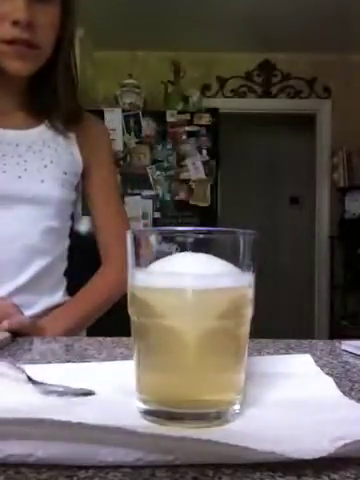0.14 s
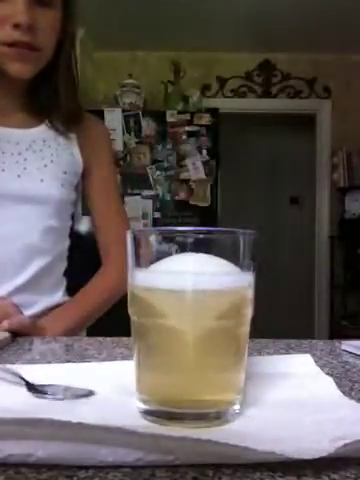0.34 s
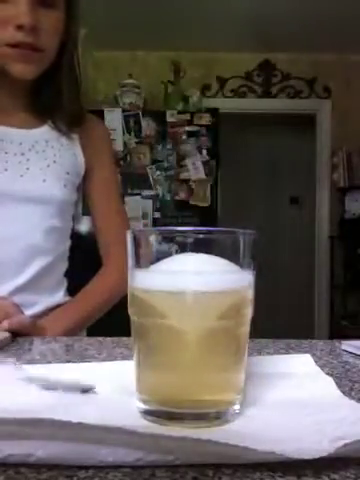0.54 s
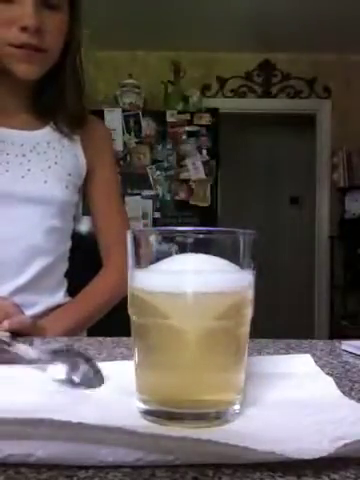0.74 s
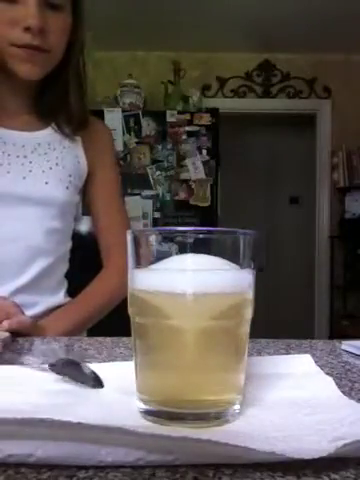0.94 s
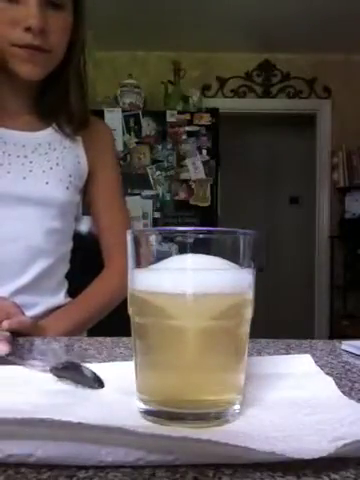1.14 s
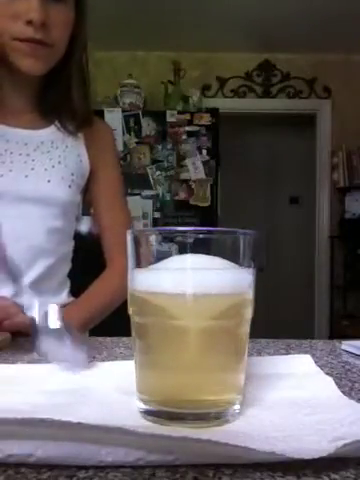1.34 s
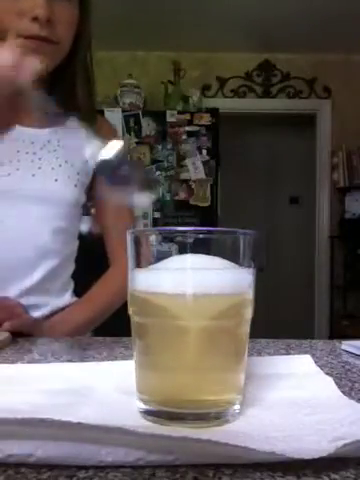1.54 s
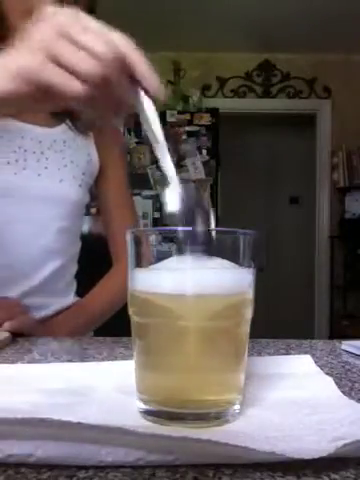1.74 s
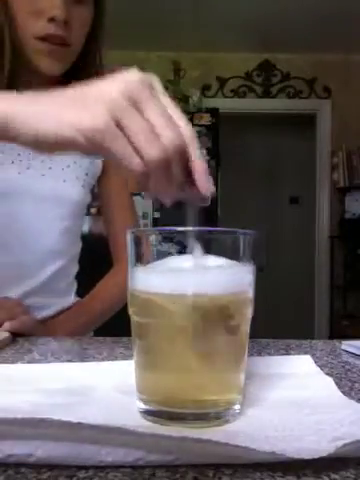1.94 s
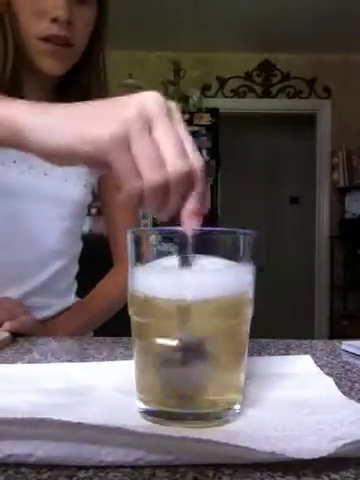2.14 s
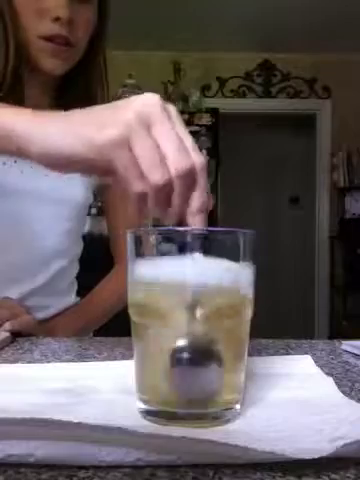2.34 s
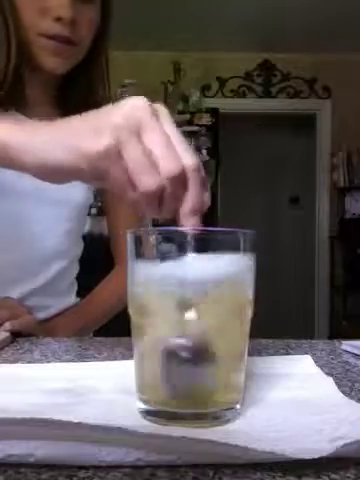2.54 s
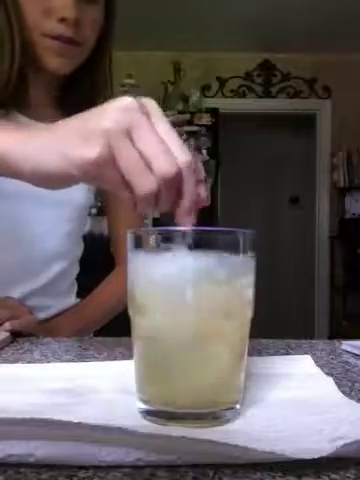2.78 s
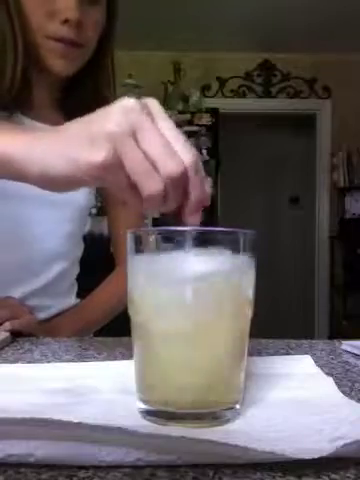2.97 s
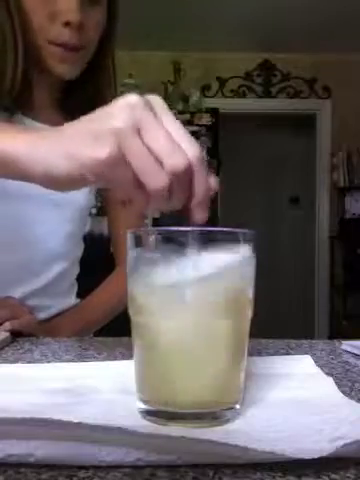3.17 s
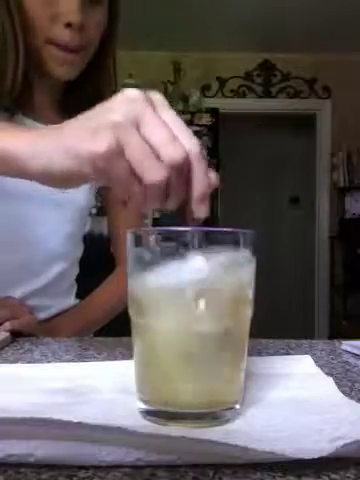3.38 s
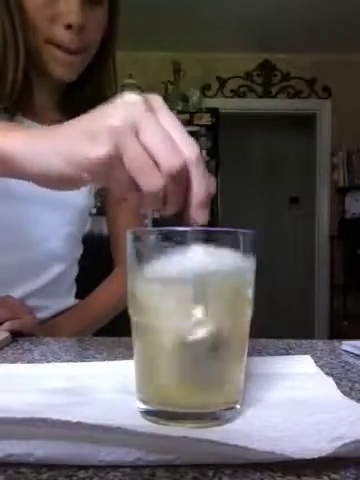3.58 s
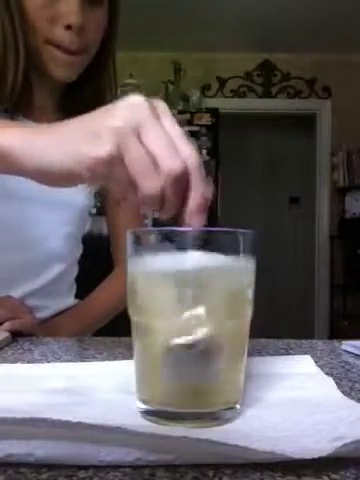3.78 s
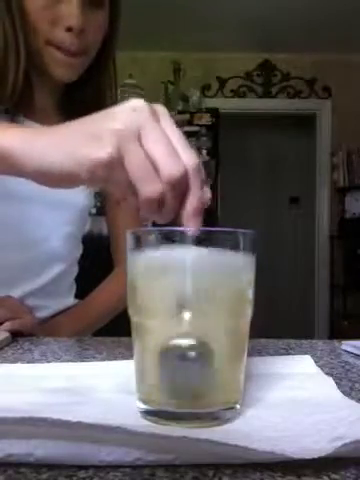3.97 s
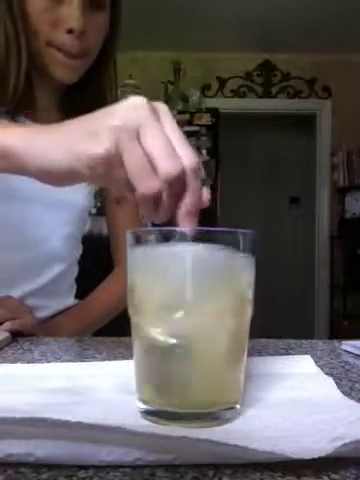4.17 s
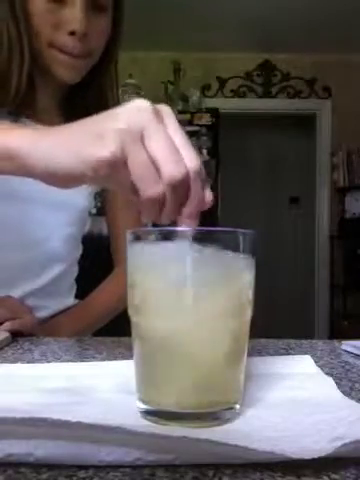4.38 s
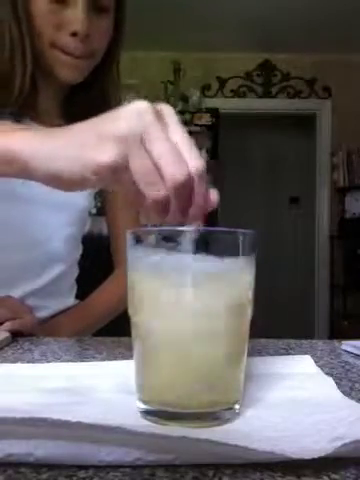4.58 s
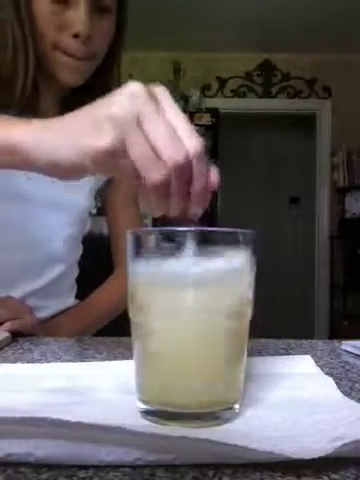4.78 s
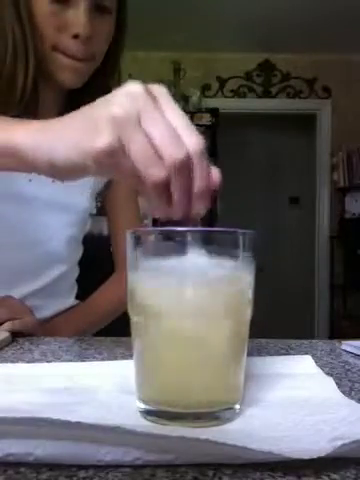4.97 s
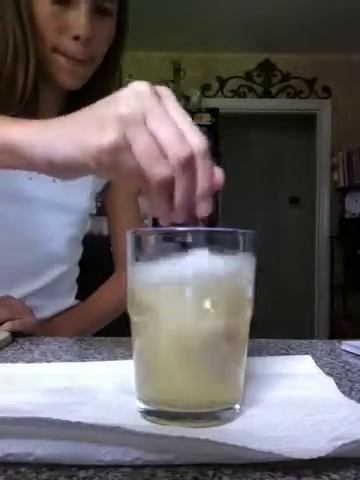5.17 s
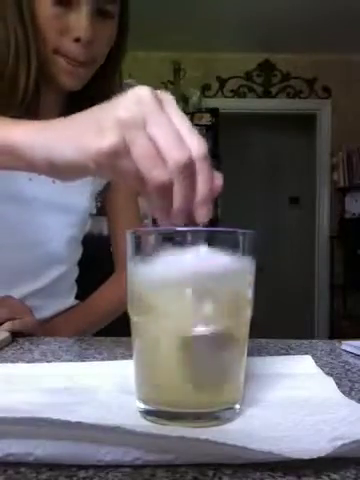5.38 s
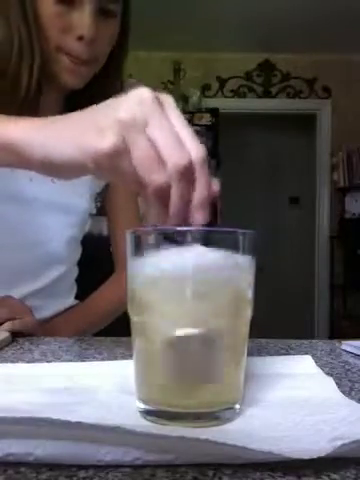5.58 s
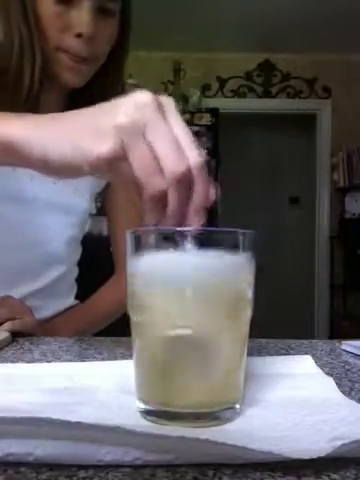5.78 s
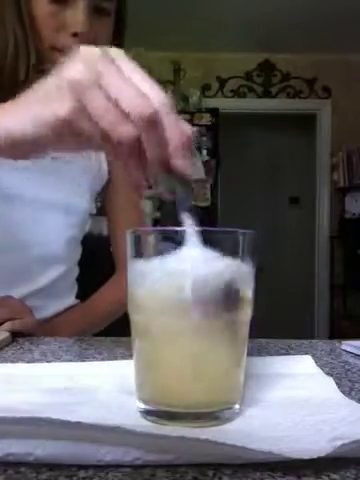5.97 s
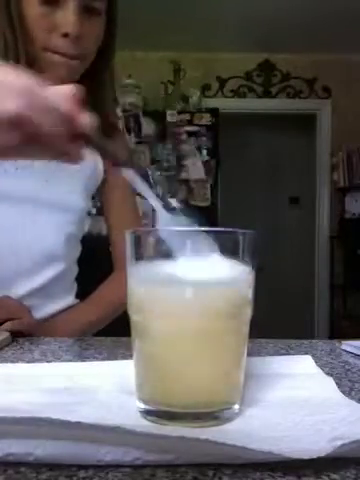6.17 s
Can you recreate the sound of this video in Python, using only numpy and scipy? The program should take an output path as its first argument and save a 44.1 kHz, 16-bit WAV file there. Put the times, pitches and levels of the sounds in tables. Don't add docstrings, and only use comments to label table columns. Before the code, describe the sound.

Metal spoon picked off a paper towel, then dipped into a foamy drink and stirred fast, clinking rapidly against the glass in a kitchen.

```python
import sys
import numpy as np
from scipy import signal
from scipy.fft import rfft, irfft, next_fast_len
from scipy.io import wavfile
from scipy.ndimage import map_coordinates

SR = 44100
rng = np.random.default_rng(int(sys.argv[2]) if len(sys.argv) > 2 else 0)


def invert_db(x):
    u = np.asarray(x, float) / 20
    return 10 ** u


def unload_wav(signal):
    wavfile.write(
        sys.argv[1],
        SR,
        np.round(np.clip(np.atleast_2d(signal).T, -1, 1) * 32767).astype(np.int16),
    )


N = 274257


def unit(x):
    return x / np.sqrt(np.mean(x ** 2) + 1e-20)


def along(points, hz):
    f, v = np.transpose(points)
    return np.interp(np.log(hz + 1), np.log(f + 1), v)


def level(rows):
    s, db = np.transpose(rows)
    return invert_db(np.interp(np.arange(N) / SR, s, db, -120, -120))


def swell(s, db, rise, fall):
    t = np.arange(N) / SR - s
    return invert_db(db - 20 * np.maximum(-t / rise, t / fall))


def wobble(rate):
    knots = rng.standard_normal(int(N * rate / SR) + 4)
    return map_coordinates(knots, [np.arange(N) * rate / SR])


def filtered(x, response):
    m = next_fast_len(N + 8192)
    return irfft(rfft(x, m) * response(np.fft.rfftfreq(m, 1 / SR)), m)[:N]


def crackle(per_s, spread_db):
    draw = rng.standard_normal((3, N))
    ticks = rng.random(N) < per_s / SR
    return unit(ticks * invert_db(spread_db * draw[0]) * np.sign(draw[1]))


def room_tone():
    # (frequency [Hz], level [dB per Hz])
    air_colour = [(15, -49.5), (38, -35), (60, -27), (100, -19), (150, -6), (240, -11.5), (387, -11.5),
                  (581, -16.5), (850, -23.5), (1720, -30.5), (4000, -36.5), (7650, -40), (12000, -48),
                  (16400, -55.5)]
    # (frequency [Hz], level [dB])
    fridge = [(151, -70), (237, -63), (291, -88.5), (377, -71)]
    air = unit(filtered(rng.standard_normal(N), lambda hz: invert_db(along(air_colour, hz))))
    t = np.arange(N) / SR
    hum = np.zeros(N)
    for hz, db in fridge:
        loudness = invert_db(db + 3.5 * wobble(9))
        hum += loudness * np.sin(2 * np.pi * hz * t + 0.9 * wobble(10))
    return invert_db(-60.5 + 0.32 * wobble(2.1)) * air + hum


def towel():
    # (peak time [s], level [dB], rise [s per 20 dB], fall [s per 20 dB])
    drags = [
        (.3, -77, .003, 0.1),
        (.44, -81, .1, 0.2),
        (.656, -70, .09, .13),
        (.832, -83, .04, .06),
        (1.406, -73, 0.087, 0),
    ]
    # (time [s], peak level [dB])
    snaps = [
        (0.6494, -63),
        (0.65, -55),
        (0.6574, -61),
        (0.723, -57),
        (0.7542, -57),
        (0.7604, -57),
    ]
    # (frequency [Hz], level [dB per Hz])
    paper = [(2500, -36), (4500, 2), (8000, 6), (11000, -1), (15000, -27)]
    rustle = unit(rng.standard_normal(N) + 0.6 * crackle(900, spread_db=-4))
    drag = sum(swell(*row) for row in drags) * rustle
    for s, db in snaps:
        drag[round(s * SR):][:90] += invert_db(db - 5) * rng.standard_normal(90) * np.hanning(90)
    return invert_db(2.5) * filtered(drag, lambda hz: invert_db(along(paper, hz)))


def drink():
    # (time [s], level [dB])
    dip = [
        (1.82, -87),
        (1.912, -77),
        (1.918, -71),
        (1.934, -74),
        (1.972, -72),
        (2.08, -83),
    ]
    # (resonance [Hz], width [Hz], level [dB])
    froth_modes = [(1780, 550, 0), (2330, 260, -3), (3650, 350, -7), (4200, 550, -8)]
    # (peak time [s], level [dB], rise [s per 20 dB], fall [s per 20 dB])
    splash = (2.243, -50, .03, .03)
    # (frequency [Hz], level [dB])
    wash = [(300, -105), (800, 14.5), (3000, 9.0), (7000, 2.0), (14000, -50.5)]
    start_s, end_s, edge_s, swirl_db = 2.1, 6.1, 0.1, -70

    def hollow(f):
        total = 0
        for centre, width, db in froth_modes:
            damping = 1j * f * width
            total = total + invert_db(db) * (damping / (centre * centre - f * f + damping)) ** 2
        return total

    froth = unit(filtered(crackle(1000, spread_db=-0.5) + 0.8 * rng.standard_normal(N), hollow))
    hiss = crackle(2500, spread_db=3) + rng.standard_normal(N)
    swirl = unit(filtered(hiss, lambda f: invert_db(along(wash, f))))
    swirl *= invert_db(2 * wobble(14))
    held = level([(start_s - edge_s, swirl_db - 16), (start_s, swirl_db),
                  (end_s, swirl_db), (end_s + edge_s, swirl_db - 15.5)])
    return invert_db(7.0) * level(dip) * froth + invert_db(-3.5) * (held + swell(*splash)) * swirl


def bubbles():
    # (time [s], level [dB], pitch [Hz], time to fall 30 dB [s])
    pockets = [
        (1.916, -51, 1650, .012),
        (3.012, -52, 1050, .03),
        (3.131, -33, 1533, 0.032),
        (3.193, -38, 1900, .015),
        (3.372, -47, 2090, .01),
        (3.547, -38, 2050, .012),
    ]
    rise = 2.1
    out, t = np.zeros(N), np.arange(SR // 8) / SR
    for s, db, hz, fall_s in pockets:
        note = np.sin(2 * np.pi * hz * (t + rise * t * t / 2))
        note *= 1 - np.exp(-t / 0.0014)
        out[round(s * SR):][:len(t)] += invert_db(db - 30 * t / fall_s) * note
    return out * invert_db(3 * wobble(150))


def contacts():
    # (time [s], edge peak [dB], wall ring [dB], upper ring [dB], spoon ring [dB])
    taps = [(2.093, -32, -5.5, 2, -8.5), (2.2628, -32.5, -2, 3, -2.5), (2.4671, -39, 0, -1, -0.5),
            (2.7873, -33.5, -8.5, -5.5, -13), (2.81, -36, -2.5, 6, -6.5), (2.946, -20.5, -8, -18, -12),
            (3.033, -32, 1, -0.5, -8), (3.3105, -22, -9, -12.5, -18), (3.4898, -27.5, -5.5, -5.5, -14),
            (3.681, -38, -4, -2, -1), (3.7575, -23.5, -2.5, 0.5, -9), (3.8611, -34, -6, -3.5, -13),
            (3.9239, -25, -4.5, -11.5, -7), (4.0261, -25, -18, -7, -2), (4.119, -23.5, -3.5, -1.5, -5.5),
            (4.2066, -29, -6, -7.5, -5.5), (4.2357, -33, 1, 1, 0.5), (4.569, -31.5, -6, -8.5, -12),
            (4.6149, -44.5, 0.5, -8, -2.5), (4.8196, -18.5, -1.5, -6, -5), (5.2873, -28, -2, -8.5, -7.5),
            (5.3541, -26, -1, -5.5, 0), (5.478, -39, -5, -9.5, -14), (6.0356, -38, -0.5, 8, 2)]
    # (time [s], edge peak [dB], thud [dB], wall ring [dB], spoon ring [dB])
    knocks = [(2.202, -40.5, 15, -7, 2), (2.4238, -23.5, 4.5, -10.5, -4), (2.6209, -25, 8, -18, -4.5),
              (2.682, -29, 9.5, -1.5, 1), (2.8305, -42, 18, -10, -5), (3.0022, -42.5, 24, 5, -12),
              (3.1763, -37.5, 19, -7, -3), (3.3524, -31, 13.5, -14, -16), (3.5306, -31.5, 15.5, -4.5, -7),
              (3.701, -30, 12, -17, -6.5), (3.8842, -31.5, 15.5, -1, -7), (4.0597, -32, 14, -5.5, -1.5),
              (4.2405, -41, 22, 5, 2), (4.2763, -33, 8, -1, -3.5), (4.4298, -35.5, 17.5, -2, 1.5),
              (4.4497, -36, 10.5, -1, -3.5), (4.7699, -30, 8, -18, -8), (4.981, -29, 5.5, -5, -3.5),
              (5.2067, -23.5, 3, -32, -1.5), (5.3762, -39.5, 14.5, -4, 9), (5.5318, -26, 4, -4.5, -4.5),
              (5.7325, -26.5, 11.5, -27, 5.5), (5.9137, -29.5, 5, -30, -3)]
    # (time [s], edge peak [dB], thud [dB], wall ring [dB], spoon ring [dB])
    slaps = [
        (2.3498, -16.5, -43, -20, -4.5),
        (2.5565, -23.5, -31, -11.5, -1),
        (3.5915, -26, 4.5, -17.5, 0.5),
        (4.8386, -30.5, 14, -20, 8.5),
        (5.1842, -30, 11, 5, 17),
        (5.3688, -41.5, 19, 6, 15.5),
        (5.5483, -31, 10, -4, 12),
        (5.557, -27, 5.5, -29, 2.5),
        (5.7215, -16.5, -1, -11, 8),
        (5.9029, -19.5, 1, -9.5, 9.5),
    ]
    # (time [s], edge peak [dB], wall ring [dB], contact [ms])
    rubs = [(2.1031, -49.5, -4, 2), (2.166, -53, 8, 5), (2.238, -42, -14, 6.5), (2.954, -52, 15, 2.4),
            (2.9874, -46.5, 9, 2.5), (3.129, -33, -3, 7.1), (3.195, -55, 2, 3.8), (3.5483, -53, 8, 3.3),
            (4.4882, -59, 8, 3.4), (4.661, -55, -8, 2.6), (4.7906, -57, -10, 2), (5.014, -54.5, 4, 2.9)]
    # (time [s], foot pitch [Hz])
    foot_pitch = [
        (2.3, 667),
        (2.42, 368),
        (4.4, 352),
        (5.1, 527),
    ]
    # (time [s], thud [dB])
    tap_thud = [
        (4.1, -22),
        (4.5, -7),
    ]
    side_hz = 565

    def quick(ms, db):
        return ms * invert_db(-0.17 * (db + 30))

    def at(s, rows):
        return np.interp(s, *np.transpose(rows))

    touches = []
    for s, db, wall, upper, spoon in taps:
        touches.append((s, db, at(s, tap_thud), wall, upper, spoon, quick(2.42, db), side_hz))
    for s, db, thud, wall, spoon in knocks:
        touches.append((s, db, thud, wall, -6, spoon, quick(2.7, db), at(s, foot_pitch)))
    for s, db, thud, wall, spoon in slaps:
        touches.append((s, db, thud, wall, -5.5, spoon, quick(2.37, db), side_hz))
    for s, db, wall, ms in rubs:
        touches.append((s, db, -9, wall, -0.5, -5, ms, side_hz))
    return sorted(touches)


def contact(ms):
    u = np.arange(SR // 50) / SR / (ms / 1000)
    skid = rng.standard_normal(len(u)) * (1 - np.exp(-u / 0.22)) * np.exp(-u ** 2 * 0.91)
    skid[3] += 8 / ms
    return skid / np.linalg.norm(skid)


def ring(modes, t, scatter_db, detune):
    hz, db, t60 = np.transpose(modes)[:, :, None]
    chance = rng.standard_normal((2, len(modes), 1))
    u = t[t < 1.5 * t60.max()]
    fade = invert_db(db + scatter_db * chance[1] - 60 * u / t60)
    y = np.sum(fade * np.sin(2 * np.pi * hz * (1 + detune * chance[0]) * u), axis=0)
    return np.pad(y / np.max(np.abs(y)), (0, len(t) - len(u)))


def echo():
    # (delay [s], level [dB])
    walls = [(.0045, -9), (0.009, -27), (0.0206, -28), (.032, -41)]
    # (frequency [Hz], t60 [s])
    kitchen = [(200, 0.16), (1000, 0.28), (4000, 0.31), (8000, 0.31), (14000, 0.27)]
    # (frequency [Hz], level [dB])
    kitchen_colour = [(250, 2), (1300, -2), (2600, 2), (3450, 6.5), (7000, -3.5), (12000, -1), (14200, -13),
                      (15300, -36)]
    hz, t, z = signal.stft(rng.standard_normal(SR // 3), SR, nperseg=256)
    fade_db = along(kitchen_colour, hz)[:, None] - 60 * t / along(kitchen, hz)[:, None]
    tail = signal.istft(z * invert_db(fade_db), SR, nperseg=256)[1]
    tail *= 1 - np.exp(-np.arange(len(tail)) / SR / 0.0017)
    tail *= invert_db(-9) / np.linalg.norm(tail)
    smear = invert_db(-60 * np.arange(200) / SR / 0.0018) / 3
    for s, db in walls:
        tail[round(s * SR):][:len(smear)] += invert_db(db) * smear * rng.standard_normal(len(smear))
    return tail


def clinks():
    # (time [s], wall pitch [Hz], wall t60 [s])
    foam = [
        (2.09, 1412, 0.23),
        (2.36, 1421, 0.14),
        (2.55, 1416, 0.043),
        (3.05, 1310, 0.021),
        (3.7, 1308, 0.021),
        (4.2, 1294, 0.042),
        (4.9, 1341, 0.03),
        (5.4, 1347, 0.021),
        (6.0, 1463, 0.024),
    ]
    # (frequency [Hz], level [dB], t60 [s])
    edge = [(1680, 0, 0.011), (1850, 2, 0.021), (2344, -3, 0.013), (8550, -8, 0.0075), (8440, 6, 0.006),
            (9510, 7.5, 0.0057), (9610, 7.5, 0.0044), (10240, -16, 0.018), (11040, -18, 0.014),
            (11500, -36.5, 0.013)]
    # (frequency [Hz], level [dB], t60 [s])
    click = [(1970, 1.5, 0.0032), (8200, 7, 0.0017), (9600, -21.5, 0.001)]
    # (multiple of its pitch, level [dB], t60 [s])
    thud = [(1, -3, 0.032), (1.45, 0, 0.021), (5.3, 6.5, 0.0038), (2.6, 10.5, 0.0058)]
    # (frequency in clear drink [Hz], level [dB], share of wall t60, follows wall pitch [power])
    upper = [(3250, -10, .15, .3), (3540, -13, .9, .6), (3575, -16, .7, .6), (3850, -16, .3, 0),
             (4650, 2, .1, -.15), (5440, -4, .15, 0)]
    # (frequency [Hz], level [dB], t60 [s])
    bowl = [(6440, 0, .012), (6920, 0, .01), (7480, -7, .01)]
    out, t = np.zeros(N + SR), np.arange(SR // 4) / SR
    when, pitches, fades = np.transpose(foam)
    for s, db, thud_db, wall_db, upper_db, spoon_db, ms, foot in contacts():
        hz, t60 = np.interp(s, when, pitches), np.interp(s, when, fades)
        foot_modes = [(k * foot, g, d) for k, g, d in thud]
        wall_modes = [(hz, 0, t60), (hz * 1.08, -9, t60 * 0.35)]
        upper_modes = [(f * (hz / 1412) ** k, g, 0.007 + share * t60) for f, g, share, k in upper]
        rings = np.array([ring(edge, t, scatter_db=2.5, detune=0.015),
                          ring(foot_modes, t, scatter_db=3, detune=0.05),
                          ring(wall_modes, t, scatter_db=3, detune=0.006),
                          ring(upper_modes, t, scatter_db=3, detune=0.003 + 0.0003 / t60),
                          ring(bowl, t, scatter_db=2.5, detune=0.01)])
        rings[2] *= 1 - np.exp(-t / 0.00078)
        parts = signal.fftconvolve(rings, contact(ms)[None], axes=1)[:, :len(t)]
        parts[1] = rings[1] * (1 - np.exp(-t / 0.00093))
        gains = invert_db([0, thud_db - 7.0, wall_db + 7.0, upper_db + 5.5, spoon_db + 5.0])
        gains = gains / np.max(np.abs(parts), axis=1)
        rings[0] = ring(click, t, scatter_db=2, detune=0.02)
        strength = gains * np.linalg.norm(parts, axis=1) / np.linalg.norm(rings, axis=1)
        spread = rings * strength[:, None]
        wet = signal.fftconvolve(invert_db([-0.5, -0.5, -6.5, -7, -3.5]) @ spread, echo())
        wet[:len(t)] += gains @ parts
        out[round((s + 0.0006) * SR):][:len(wet)] += invert_db(db - 2) * wet
    out = signal.sosfilt(signal.butter(3, 190, "high", fs=SR, output="sos"), out[:N])
    jolt_band = signal.butter(2, [22, 70.6], "band", fs=SR, output="sos")
    out += invert_db(-38.5) * signal.sosfilt(jolt_band, np.abs(out))
    return signal.sosfilt(signal.butter(6, 13500, fs=SR, output="sos"), out)


def scene():
    return (room_tone() + towel() + drink() + bubbles() + clinks())[None]


def roll_off(x):
    return signal.sosfilt(signal.butter(12, 16500, fs=SR, output="sos"), x)


def record(dry):
    return roll_off(dry)


dry = scene()
out = record(dry)
unload_wav(out)
```